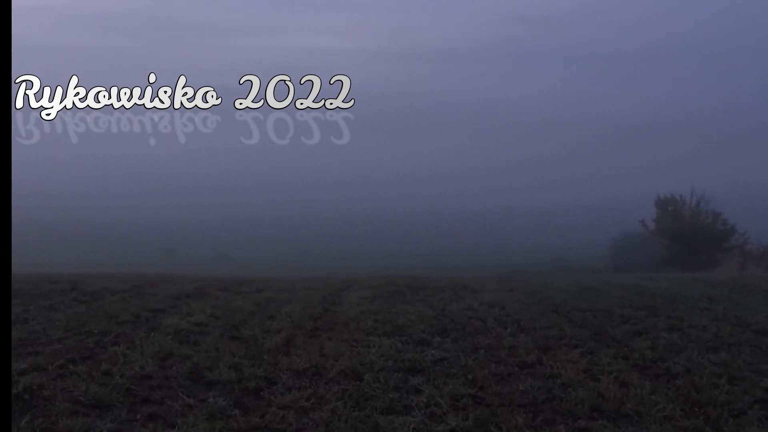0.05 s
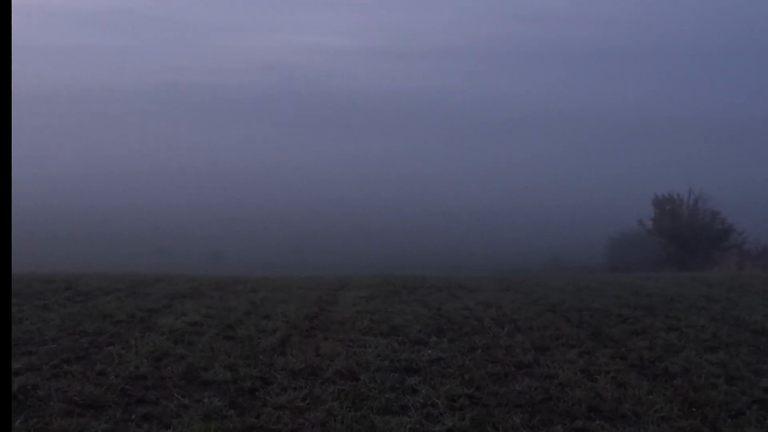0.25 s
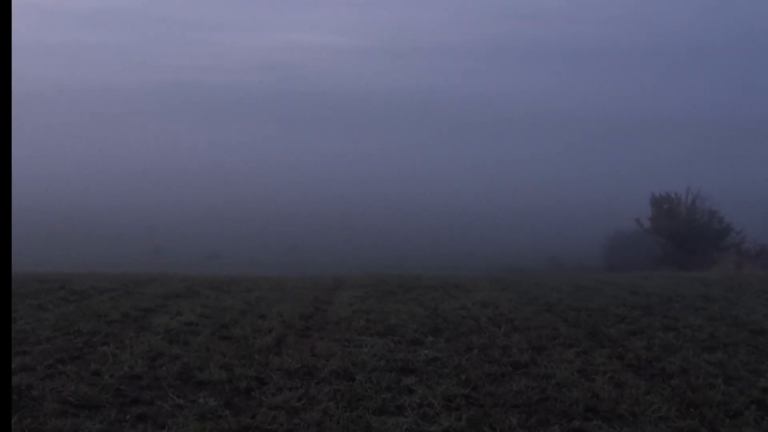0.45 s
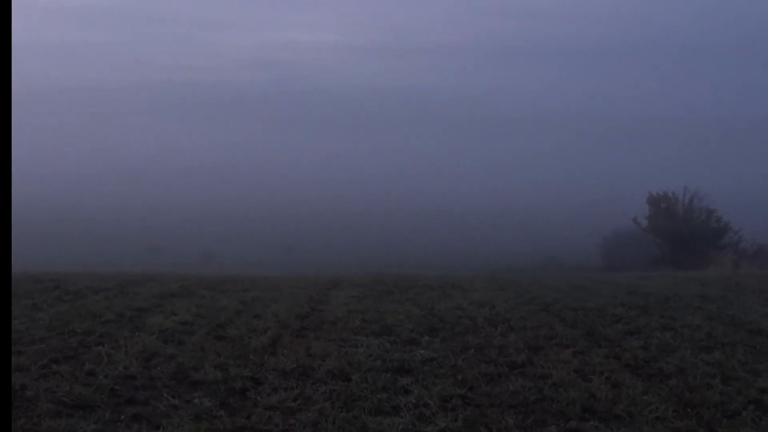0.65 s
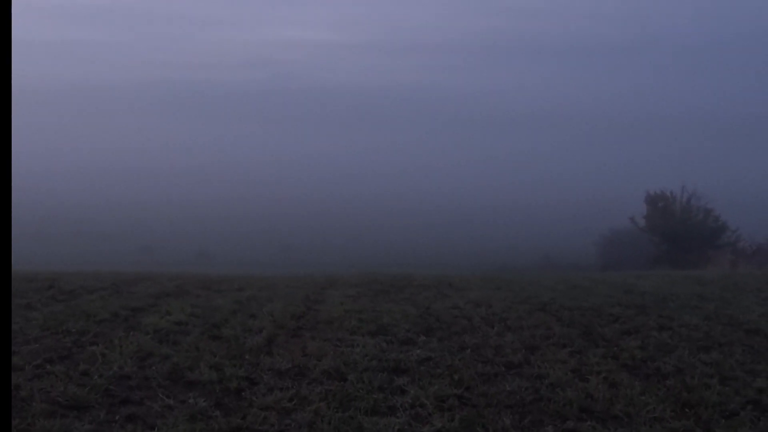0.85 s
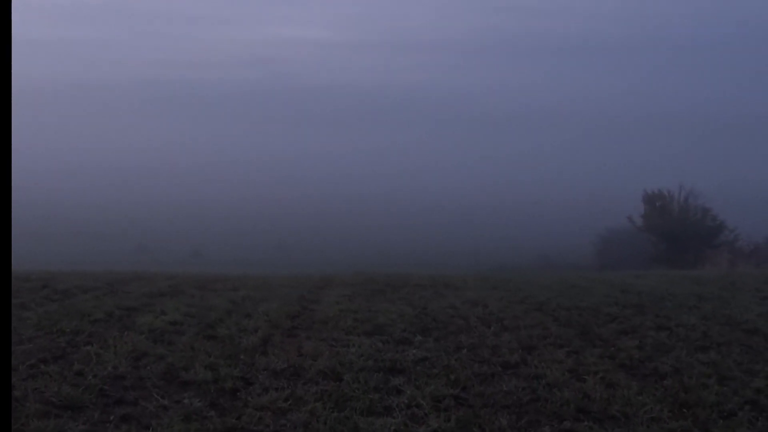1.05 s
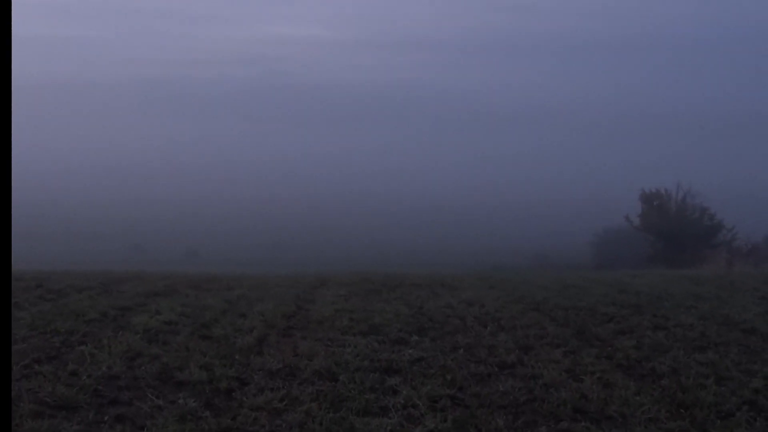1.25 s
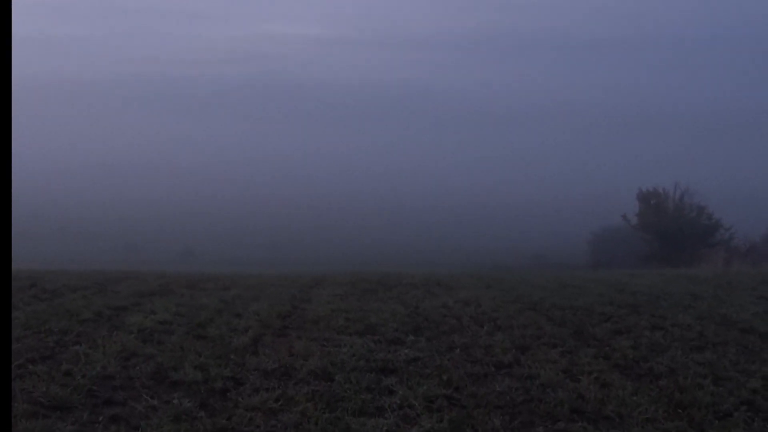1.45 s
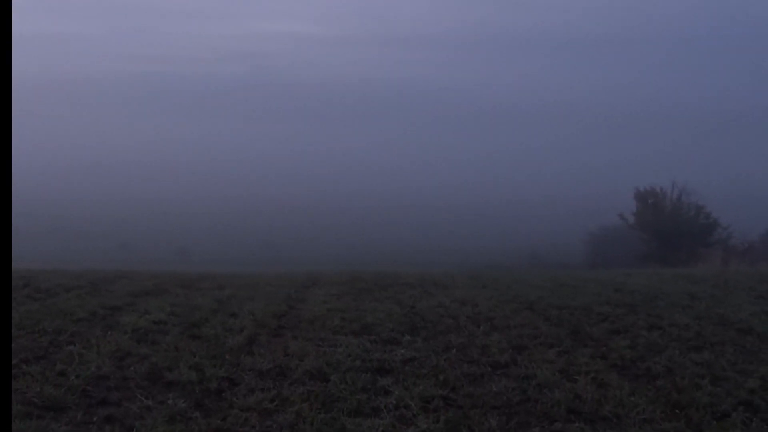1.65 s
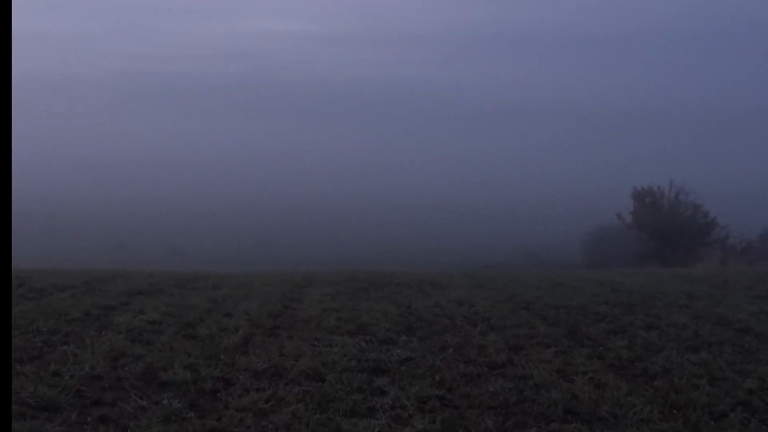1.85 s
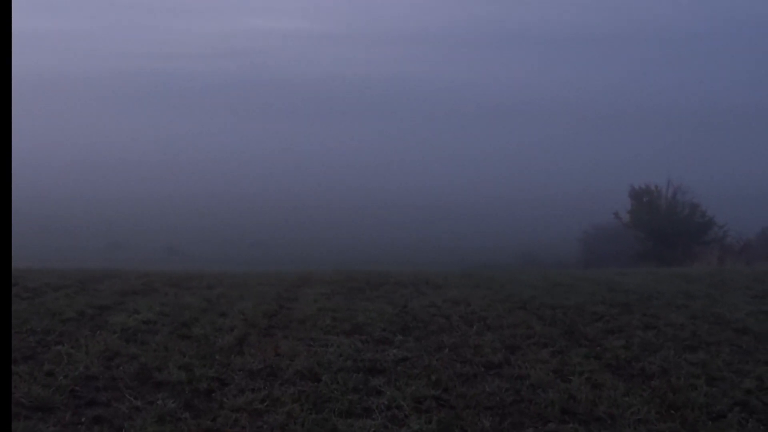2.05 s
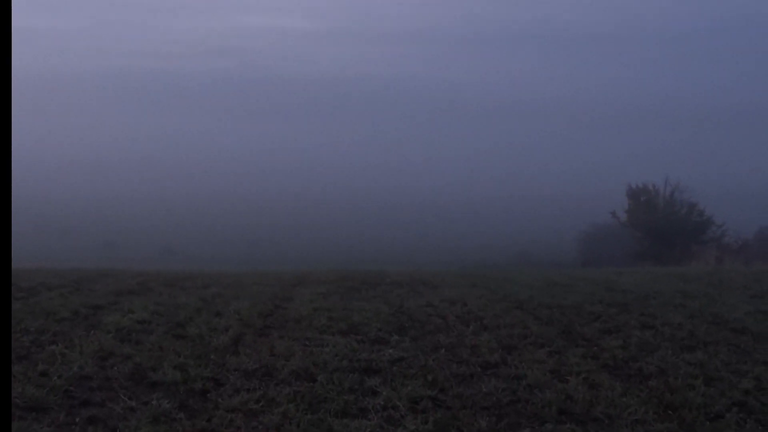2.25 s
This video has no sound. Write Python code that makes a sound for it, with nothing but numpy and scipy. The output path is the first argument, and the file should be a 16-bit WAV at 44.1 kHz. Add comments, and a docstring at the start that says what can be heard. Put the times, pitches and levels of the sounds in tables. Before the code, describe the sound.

Far off to the right across a field, a deer bellows a clear, drawn-out note that ends hoarsely, then a shorter, weaker call answers. Behind the echo lie faint distant roaring, microphone hiss and, later, a low drone.

```python
"""A misty field at the edge of a wood. Far off, a red deer stag bellows once: the harmonics of its vocal
folds, filtered by throat resonances, rise and sink in a clear note that breaks into a rasp.
A fainter call follows, perhaps another stag, and the trees scatter both into a diffuse echo.
The wood's edge smears distant roaring into a hoarse wash that stops short. A low drone, like a far
engine, comes in underneath; the open air murmurs and the microphones hiss throughout."""
import sys
import numpy as np
from scipy import signal
from scipy.fft import rfft, irfft
from scipy.io import wavfile

SR = 44100
rng = np.random.default_rng(int(sys.argv[2]) if len(sys.argv) > 2 else 0)


def waveform_to_disk(signal):
    """Save audio, clipped to [-1, 1], as 16-bit WAV at the path in sys.argv[1]."""
    frames = np.transpose(np.atleast_2d(signal))
    scaled = np.clip(frames, -1, 1) * 32767
    samples = np.round(scaled).astype(np.int16)
    wavfile.write(sys.argv[1], SR, samples)


N = 105840
TIME = np.arange(N) / SR
BIN_HZ = np.arange(N // 2 + 1) * SR / N


def undb(db):
    """Amplitude ratio of a level in decibels."""
    return 10 ** (np.asarray(db) / 20)

def curve(rows, column=1):
    """Linear interpolation of one column over time."""
    rows = np.array(rows, float)
    return np.interp(TIME, rows[:, 0], rows[:, column])

def colour(rows):
    """Spectral envelope: gain per bin, interpolated over log frequency."""
    hz, db = np.array(rows, float).T
    return undb(np.interp(np.log(BIN_HZ + 1), np.log(hz), db))

def noise(gain):
    """Spectral shaping: filtered white noise, scaled to unit RMS."""
    shaped = irfft(rfft(rng.standard_normal(N)) * gain, N)
    return shaped / np.sqrt(np.mean(shaped ** 2))

def flutter(bandwidth_hz):
    """Random modulation: low-pass noise of unit RMS."""
    return noise(np.exp(-(BIN_HZ / bandwidth_hz) ** 2))

def stereo_noise(gain, side_gain):
    """Partial coherence: a common mid noise plus a side noise in antiphase."""
    mid, side = (irfft(rfft(rng.standard_normal(N)) * g, N) for g in (gain, gain * side_gain))
    return np.array([mid + side, mid - side]) / np.std(mid)


# Murmur spectrum and side-to-mid ratio (frequency [Hz], level [dB])
MURMUR_SPECTRUM = [(20, -17.5), (45, -11), (100, -3), (135, 6), (180, 1), (250, -8), (400, -50.5),
                   (1000, -42)]
MURMUR_SIDE = [(40, -22), (110, -20), (200, -7.5)]
# Murmur envelope (time [s], level [dB])
MURMUR_ENVELOPE = [(0, -58), (.8, -59.5), (1.4, -60.5), (1.9, -68), (2.4, -67.5)]

def air_murmur():
    """Ambient noise: the low murmur of open air, largely coherent at the two microphones."""
    return stereo_noise(colour(MURMUR_SPECTRUM), colour(MURMUR_SIDE)) * undb(curve(MURMUR_ENVELOPE))


# Hiss spectrum and side-to-mid ratio (frequency [Hz], level [dB])
HISS_SPECTRUM = [(300, -3.5), (2500, -3.5), (4000, -9), (6300, -14), (7800, -14), (9500, -7.5), (12500, -4),
                 (14500, -3), (16000, -9)]
HISS_SIDE_RATIO = [(300, 3), (4400, -1), (8000, -6), (14000, -12.5)]
# Hiss envelope (time [s], level [dB])
HISS_ENVELOPE = [(0, -67), (.4, -66.5), (.75, -63.5), (1.3, -65), (1.7, -66), (2, -67), (2.4, -67.5)]

def microphone_hiss():
    """Self-noise: the microphones add a broadband floor."""
    return stereo_noise(colour(HISS_SPECTRUM), colour(HISS_SIDE_RATIO)) * undb(curve(HISS_ENVELOPE))


# Lag of the left microphone (frequency [Hz], phase [rad])
LEFT_LAG = [(20, 2.5), (460, 0.69), (1030, 1.6), (1400, 1.03), (2070, 0.98), (2800, 2.5)]

def from_right(left, right):
    """Phase difference: sound from the right reaches the left microphone later."""
    hz, lag = np.array(LEFT_LAG).T
    shift = np.exp(-1j * np.interp(BIN_HZ, hz, lag))
    return np.array([irfft(rfft(left) * shift, N), right])


def broad_resonances(rows, steepness=1.26):
    """Resonance: gain per bin of Lorentzian-like peaks with wide skirts."""
    return sum(undb(db) / (1 + (2 * (BIN_HZ - centre) / width) ** 2) ** steepness
               for centre, width, db in rows)


# Throat resonances of the distant roaring (centre [Hz], width [Hz], gain [dB])
ROAR_FORMANTS = [(366, 84, -4), (463, 70, -0.5), (667, 237, -3), (897, 164, -4), (1020, 120, -15),
                 (1360.6, 144, -3), (1507, 45, -7.5), (1691, 150, -9), (2078, 146, -7.5),
                 (2623, 150, -14.5)]
# Spectrum between them (frequency [Hz], level [dB])
ROAR_SPECTRUM = [(150, -24), (290, -10.5), (550, -12), (1200, -15.5), (1900, -25), (2300, -32.5),
                 (2850, -22), (4000, -38), (8000, -55)]
# Roaring envelope (time [s], level of the two lowest formants [dB], level of the rest [dB])
ROAR_ENVELOPE = [(0, -64, -55), (.3, -63, -54), (.6, -63.5, -54), (1.0, -55.5, -51), (1.3, -59.5, -53.5),
                 (1.62, -60.5, -53.5), (1.8, -66, -55.5), (1.92, -70, -55.5), (1.945, -67, -64.5),
                 (2.1, -86, -73.5), (2.4, -88, -79)]

def distant_roaring(side_db=-8, flicker_db=1.63):
    """Scattering smears far roars into noise bands that flicker independently; the lowest fade first."""
    low = stereo_noise(broad_resonances(ROAR_FORMANTS[:2]), undb(side_db))
    low *= undb(flicker_db * flutter(15))
    rest_gain = broad_resonances(ROAR_FORMANTS[2:]) + colour(ROAR_SPECTRUM)
    spectrum = rfft(stereo_noise(rest_gain, undb(side_db)))
    third_octaves = 3 * np.log2(np.maximum(BIN_HZ, 100) / 100)
    rest = np.zeros((2, N))
    for k in range(20):
        band = irfft(spectrum * np.maximum(1 - abs(third_octaves - k), 0), N)
        rest += band * undb(flicker_db * flutter(19))
    wash = low * undb(curve(ROAR_ENVELOPE)) + rest * undb(curve(ROAR_ENVELOPE, column=2))
    return from_right(*wash)


def formant_gain(hz, rows):
    """Vocal-tract resonance: Gaussian peaks with steep flanks."""
    return sum(undb(db) * np.exp(-(2 * (hz - centre) / width) ** 2) for centre, width, db in rows)


# The first throat resonance, then the bright ones (centre [Hz], width [Hz], gain [dB])
STAG_FORMANTS = [(448, 175, -3.5), (1096, 90, 3), (1360, 98, -13), (1518, 104, 0), (1869, 110, -1),
                 (2092, 150, -14)]
# Air rushing out with the voice (frequency [Hz], level [dB])
BREATH_SPECTRUM = [(100, -22), (200, -20), (300, -7), (450, 3.5), (600, -3), (780, 0.5), (920, -5.5),
                   (1150, -14), (1400, -25), (1750, -27), (2080, -12.5), (2400, -40), (5000, -52)]
# The bellow and the fainter call (time [s], pitch [Hz], first formant level [dB],
# second formant level [dB], bright formant level [dB], roughness [0-1], second formant centre [Hz])
LOUD_CALL = [(0.16, 116, -70, -64, -78, 0.37, 850), (0.192, 119.5, -59, -55, -76, 0.3, 850),
             (0.207, 123, -57, -43, -73, 0.3, 870), (0.235, 127.2, -48.5, -65, -80, 0.1, 846),
             (0.27, 131.6, -44.5, -52, -71, 0.18, 830), (0.295, 136.5, -49.5, -44.5, -78.5, 0.12, 794),
             (0.35, 146.7, -45.5, -48, -54, 0.08, 860), (0.39, 151.5, -41.5, -46.5, -62.5, 0.01, 822),
             (0.45, 154.8, -33, -44, -60, 0.1, 815), (0.54, 155.2, -31, -51.5, -61, 0.1, 767.8),
             (0.615, 153.5, -29.5, -46.5, -59.5, 0, 739.5), (0.66, 151, -33, -45.5, -59.5, 0.08, 784),
             (0.77, 148.3, -35.5, -43, -61, 0.07, 769.3), (0.87, 144.3, -38, -41.5, -65.5, 0.14, 771),
             (0.95, 136.5, -42.5, -50, -69.5, 0.63, 796), (1.03, 135.9, -48, -58.5, -63, 0.77, 815.3),
             (1.12, 128, -57.5, -55, -62.5, 0.4, 795.5), (1.27, 124.6, -53, -69, -71, 0.21, 786),
             (1.45, 119.5, -80, -70, -79, 0.22, 804)]
FAINT_CALL = [(1.34, 148.7, -84, -87, -84, 0.28, 801), (1.42, 155.6, -49, -66, -64, 0.095, 794),
              (1.53, 153.4, -54.5, -63, -75, 0.23, 774), (1.63, 135.3, -52, -58.5, -70, 0.6, 790),
              (1.73, 125.6, -70, -62, -74, 0.4, 863)]

def stag(call, jitter=0.025, rasp_hz=67.5, breath_db=-12, second_width_hz=195):
    """Source and filter: throat formants shape vocal-fold harmonics; irregular vibration makes the rasp."""
    start, end = call[0][0], call[-1][0]
    pitch, roughness, second_hz = (curve(call, column) for column in (1, 5, 6))
    first, second, bright = (undb(curve(call, column)) for column in (2, 3, 4))
    phase = 2 * np.pi * np.cumsum(pitch * (1 + jitter * roughness * flutter(48))) / SR
    # The first formant starts 21% low and rises as the mouth opens.
    mouth = 1 - 0.21 * np.exp(-np.maximum(TIME - start, 0) / 0.1)
    voice = np.zeros(N)
    for k in range(2, 18):
        hz = k * pitch
        amplitude = (first * formant_gain(hz / mouth, STAG_FORMANTS[:1])
                     + second * formant_gain(hz, [(second_hz, second_width_hz, 0)])
                     + bright * formant_gain(hz, STAG_FORMANTS[1:]))
        voice += amplitude * np.sin(k * phase + rng.uniform(0, 2 * np.pi))
    voice *= (1 + roughness * flutter(rasp_hz)) / np.sqrt(1 + roughness ** 2)  # keeps the mean power
    breath = undb(breath_db) * (first + second) * np.sqrt(roughness) * noise(colour(BREATH_SPECTRUM))
    breath *= 1 + 0.5 * np.cos(phase)  # pulses with the folds
    fade = np.clip((TIME - start) / 0.067, 0, 1) * np.clip((end - TIME) / 0.11, 0, 1)
    return (voice + breath) * fade


def wood_echo(calls, level_db=-16.5, t60_s=3.5, onset_s=0.013):
    """Reverberation: trees scatter the calls into a decaying tail, different at each microphone."""
    decay = np.exp(-np.log(1000) * TIME / t60_s)
    build_up = 1 - np.exp(-(TIME / onset_s) ** 2)
    tail = rng.standard_normal((2, N)) * decay * build_up
    tail /= np.sqrt(np.sum(tail ** 2, axis=1, keepdims=True))
    return undb(level_db) * signal.fftconvolve(calls[None], tail, axes=1)[:, :N]


# Engine orders (multiple of the fundamental [1], level [dB])
ENGINE_ORDERS = [(1, -1), (2, -13.5), (3, -20.5)]
# Spectrum of the engine's rush (frequency [Hz], level [dB])
RUSH_SPECTRUM = [(100, -2.5), (350, -7.5), (520, -2.5), (670, 5), (790, -15), (900, -6.5), (1150, -16.5),
                 (1680, -17.5), (1900, -34.5), (2080, -35.5), (2400, -48.5), (5000, -34)]
# Engine envelope (time [s], level [dB])
ENGINE_ENVELOPE = [(0, -98), (1.05, -84), (1.3, -63.5), (1.6, -56.5), (2.4, -57.5)]

def far_engine(fundamental_hz=65.8, rush_db=-6.5, throb_depth=0.25):
    """Harmonic series: low orders waver over a dull rush, amplitude-modulated at their fundamental."""
    phase = 2 * np.pi * np.cumsum(fundamental_hz * (1 + 0.012 * flutter(7.1))) / SR
    hum = sum(np.sqrt(2) * undb(db + flutter(45)) * np.sin(k * phase) for k, db in ENGINE_ORDERS)
    rush = undb(rush_db) * stereo_noise(colour(RUSH_SPECTRUM), side_gain=undb(0.5))
    rush *= 1 + throb_depth * np.sin(phase)
    return (hum + rush) * undb(curve(ENGINE_ENVELOPE))


def scene():
    """Superposition: the background, two calls from the right, their echo and the engine add up."""
    background = air_murmur() + microphone_hiss() + distant_roaring()
    calls = np.sqrt(2) * (stag(LOUD_CALL) + stag(FAINT_CALL))
    return background + from_right(calls, calls) + wood_echo(calls) + far_engine()

def record(dry, cutoff_hz=15800):
    """Band limiting: a steep low-pass filter removes the highest treble."""
    return signal.sosfilt(signal.ellip(10, 0.2, 70, cutoff_hz, fs=SR, output="sos"), dry)


dry = scene()
out = record(dry)
waveform_to_disk(out)
```